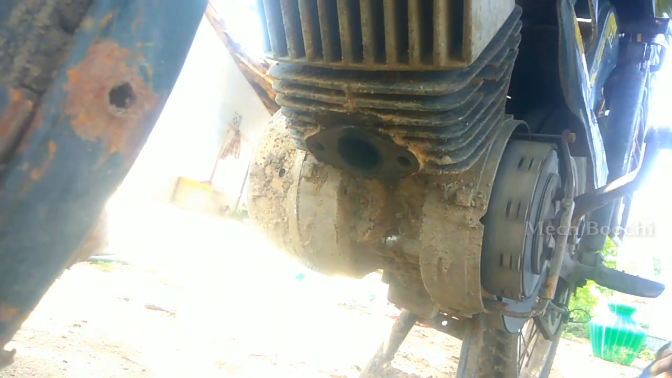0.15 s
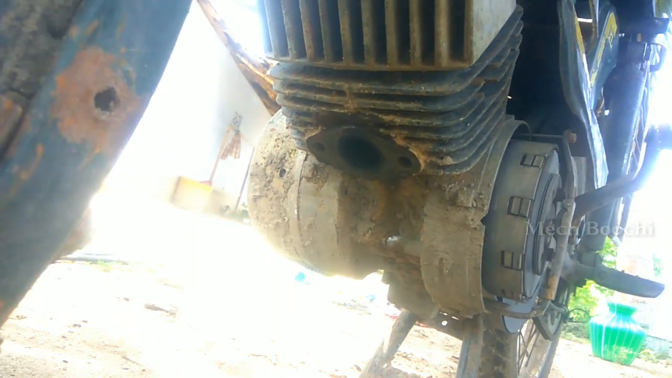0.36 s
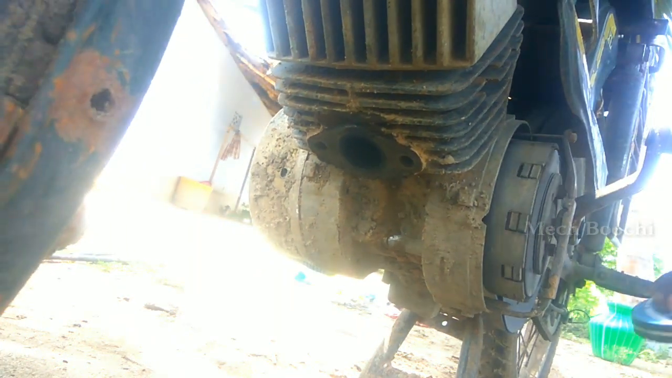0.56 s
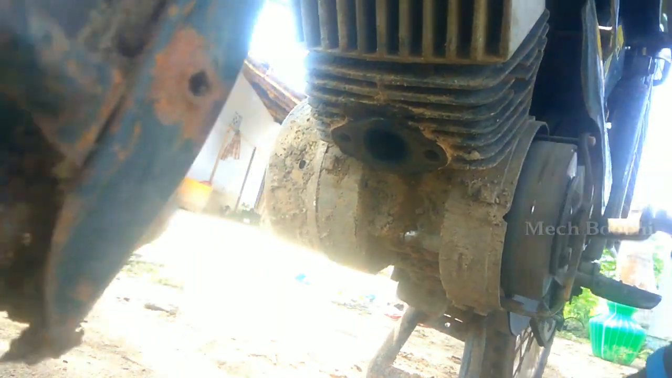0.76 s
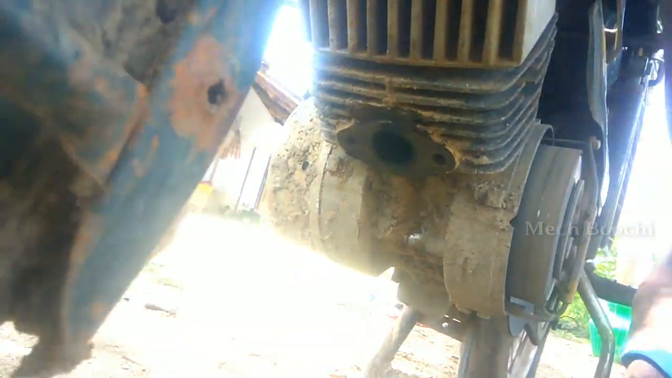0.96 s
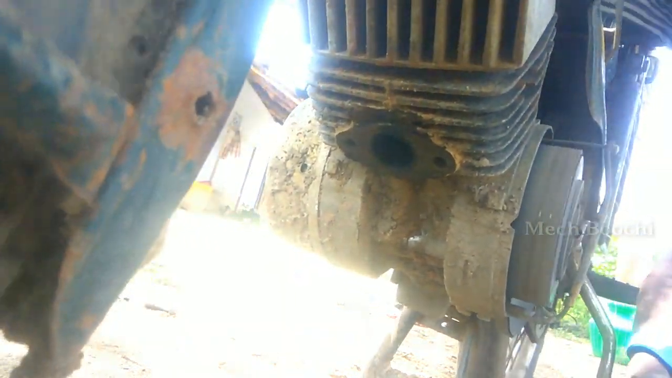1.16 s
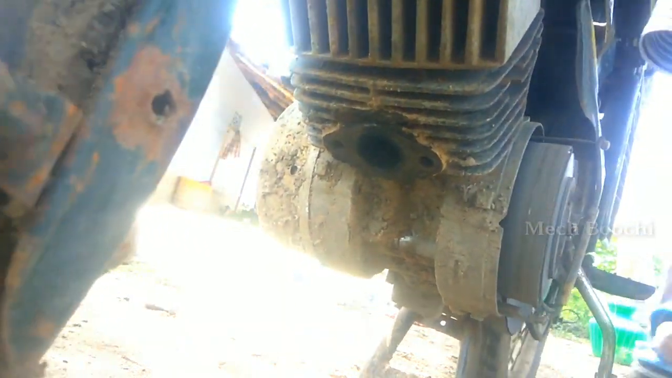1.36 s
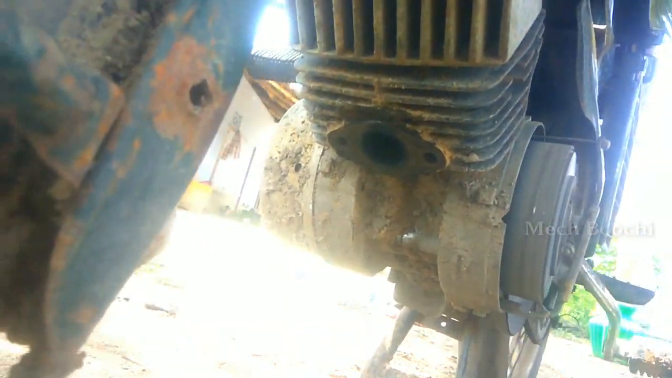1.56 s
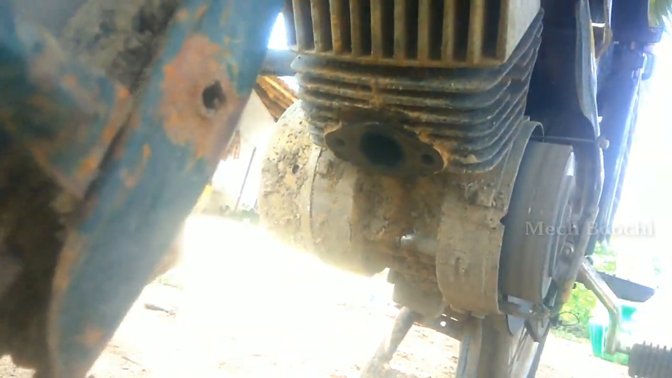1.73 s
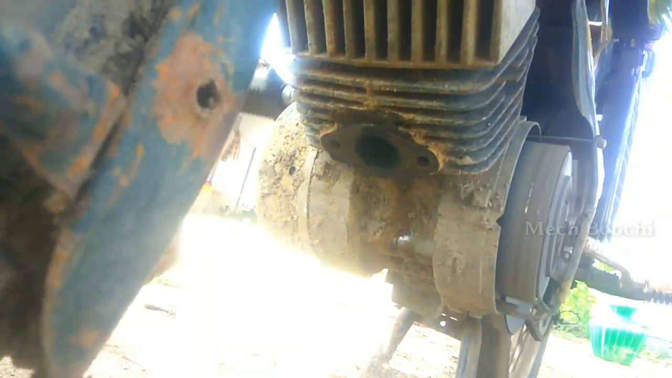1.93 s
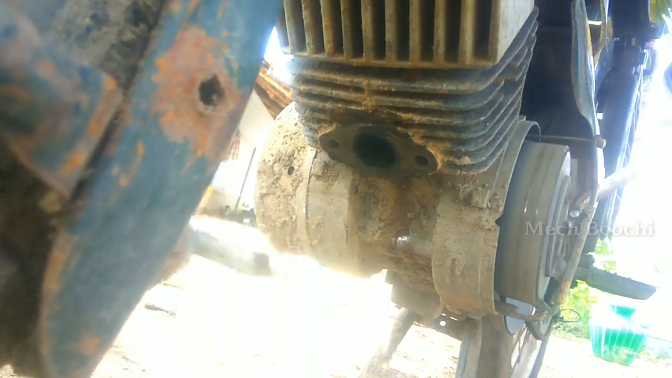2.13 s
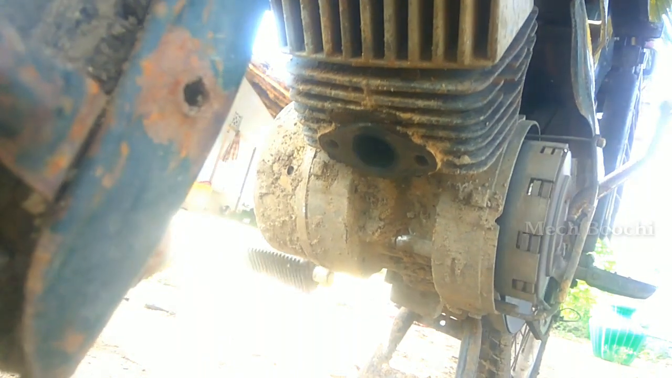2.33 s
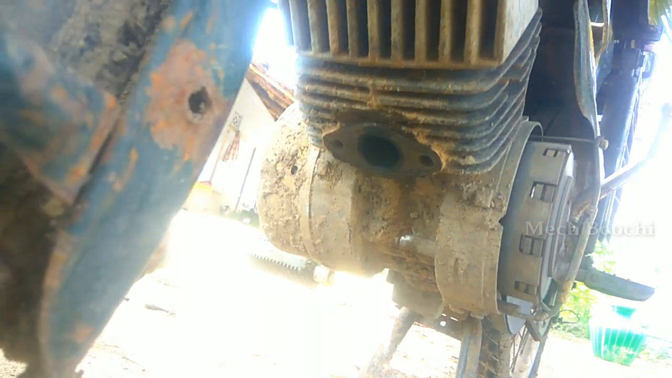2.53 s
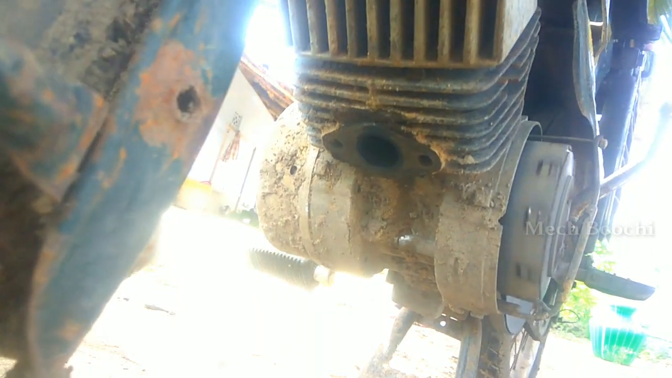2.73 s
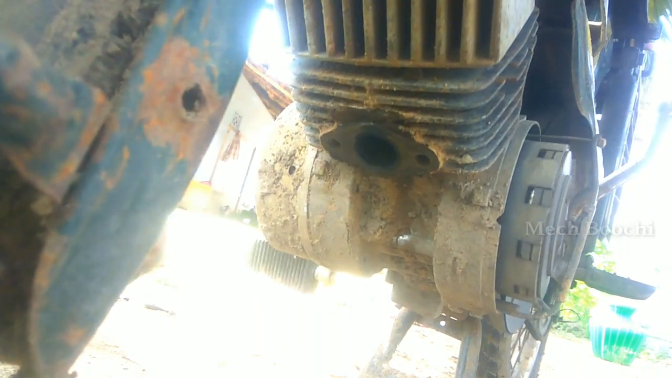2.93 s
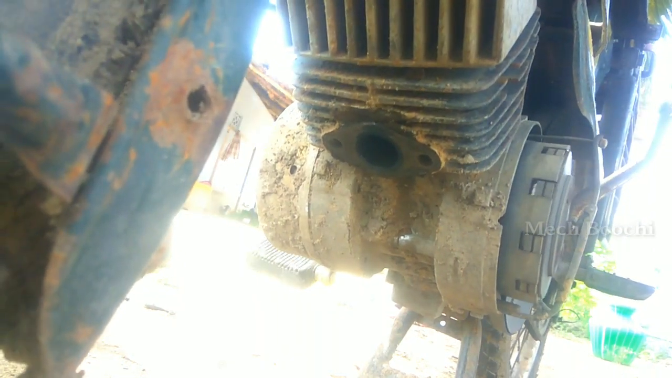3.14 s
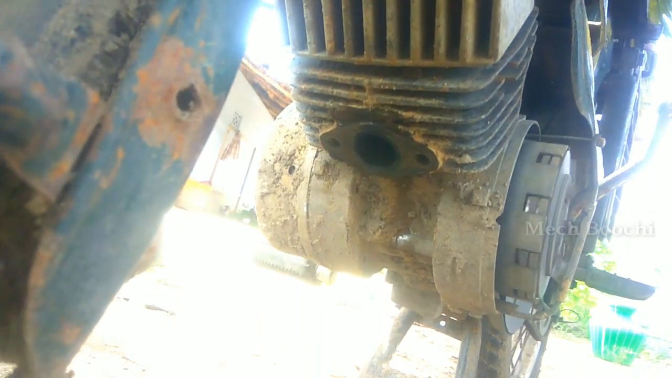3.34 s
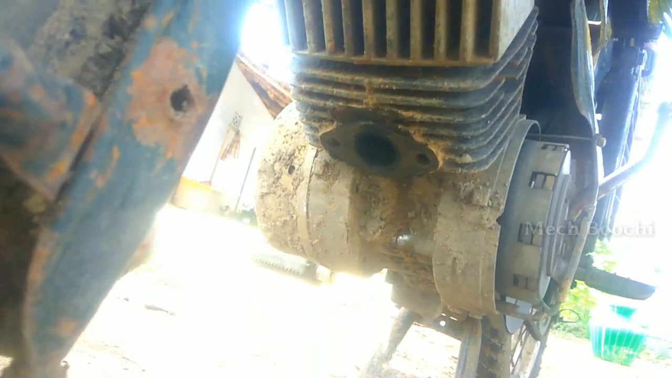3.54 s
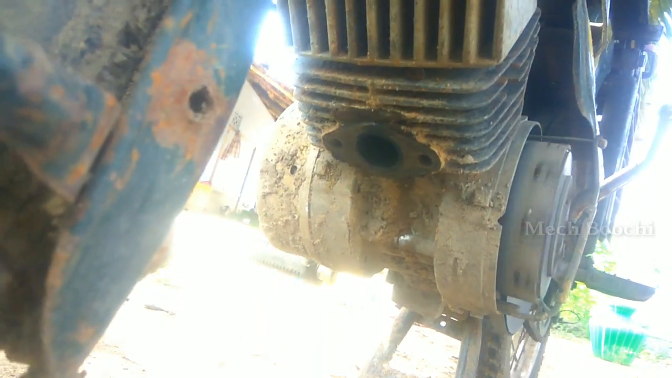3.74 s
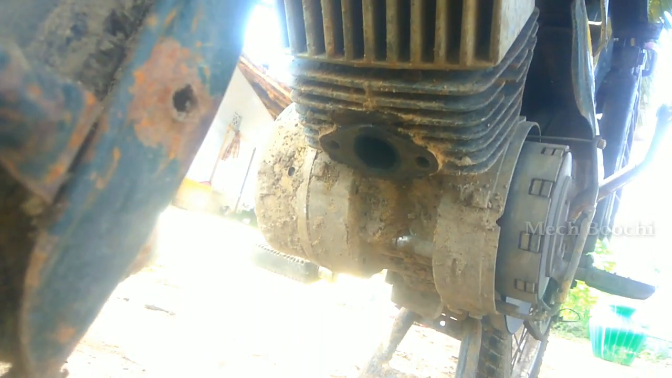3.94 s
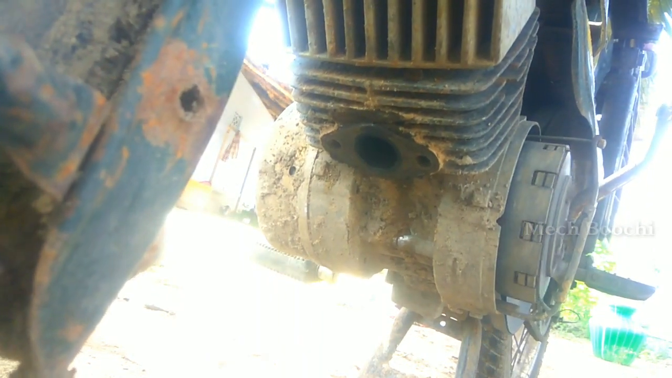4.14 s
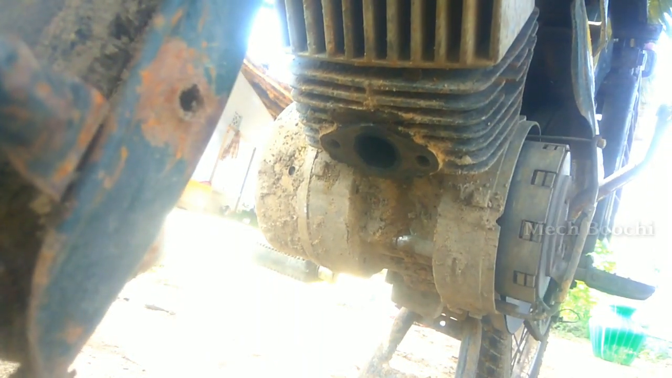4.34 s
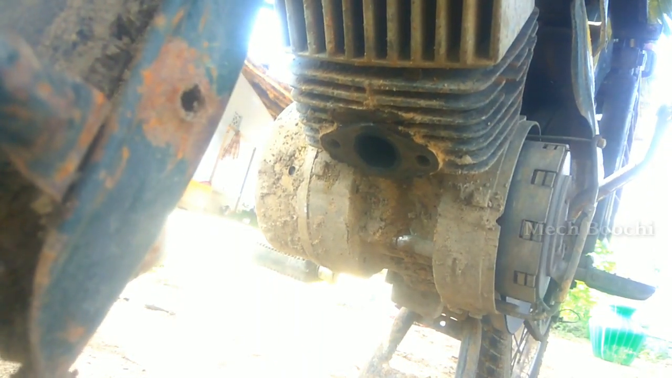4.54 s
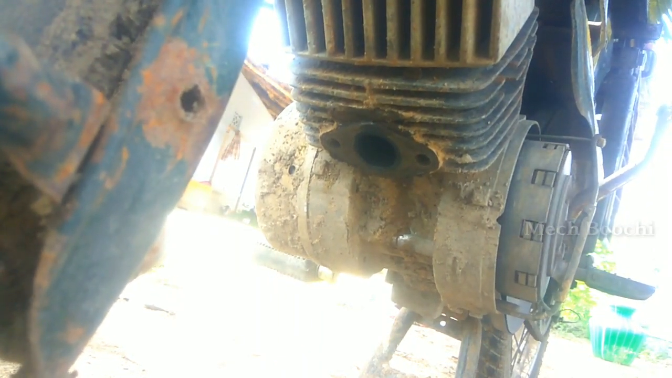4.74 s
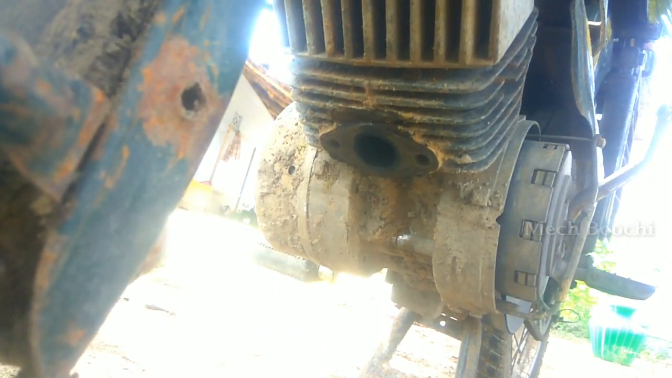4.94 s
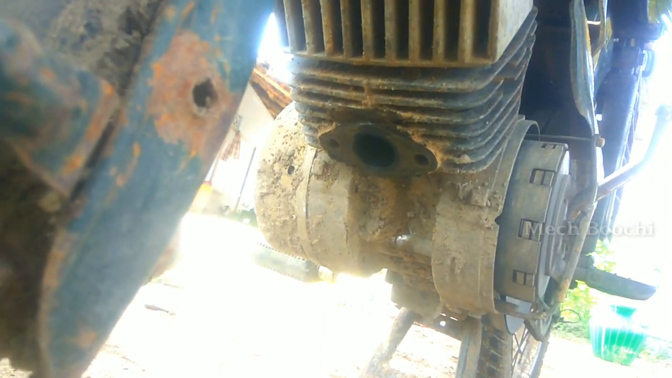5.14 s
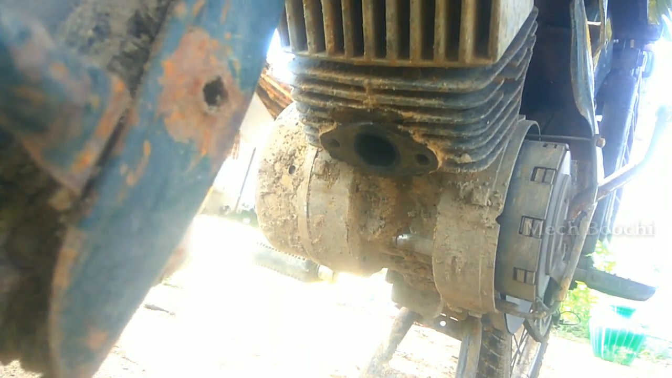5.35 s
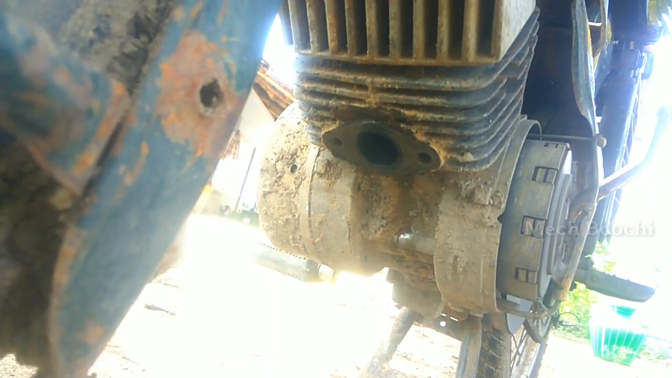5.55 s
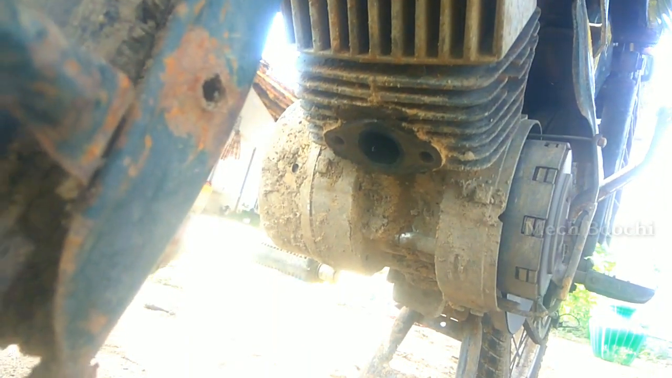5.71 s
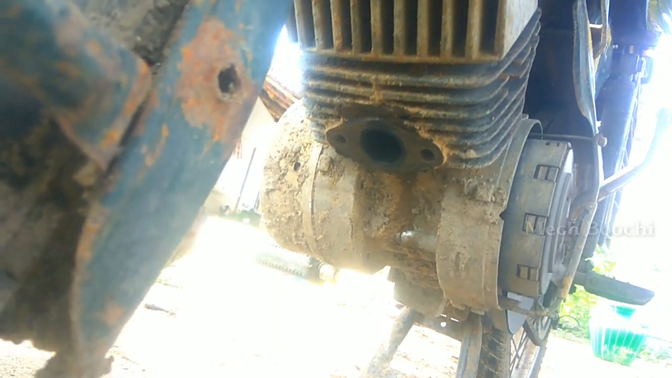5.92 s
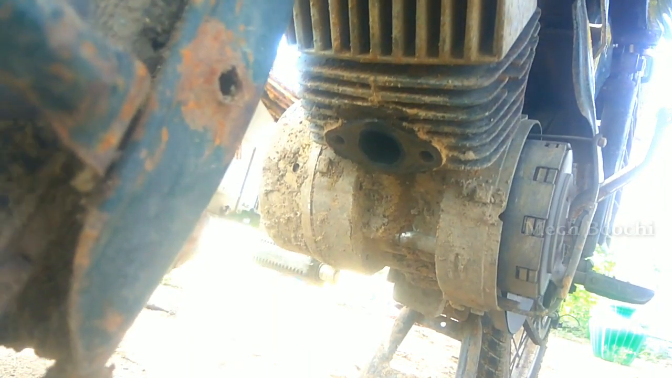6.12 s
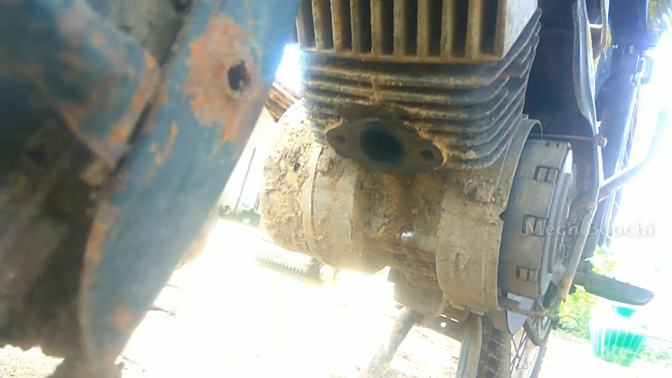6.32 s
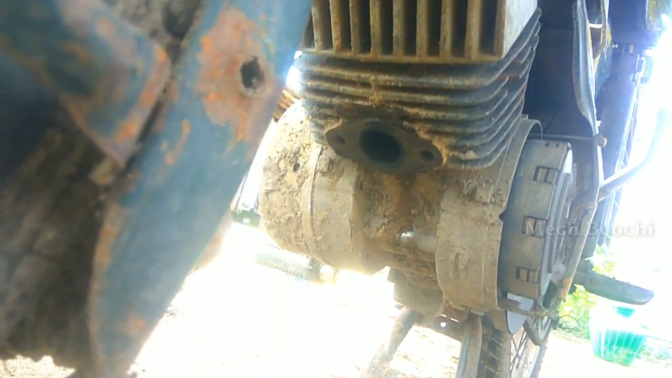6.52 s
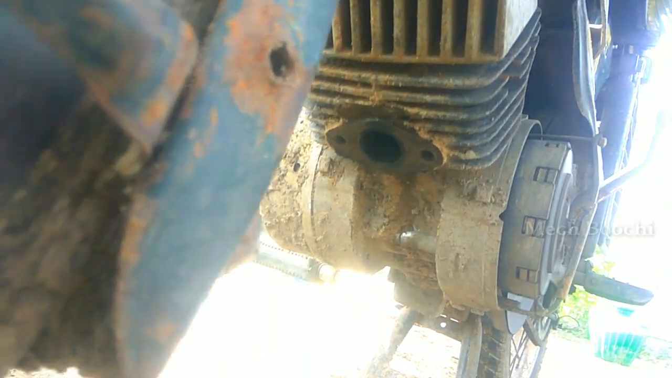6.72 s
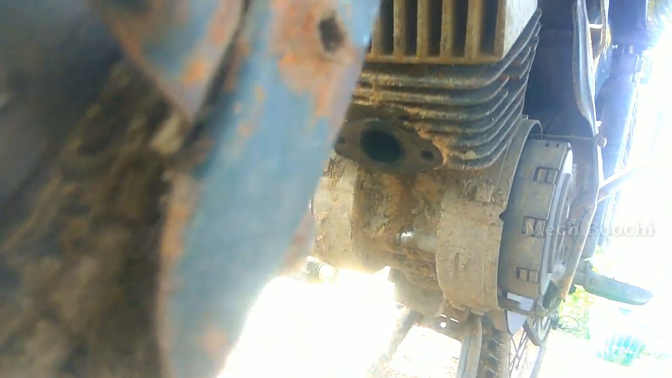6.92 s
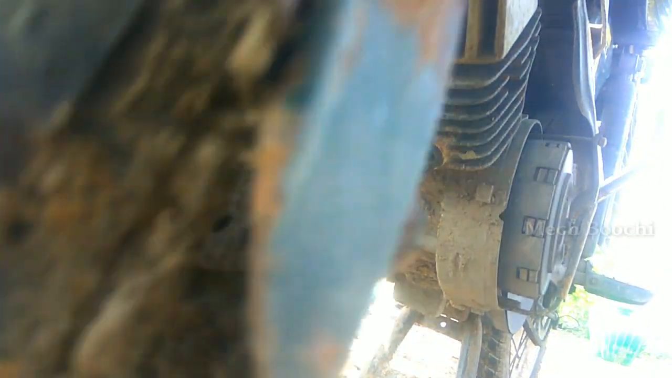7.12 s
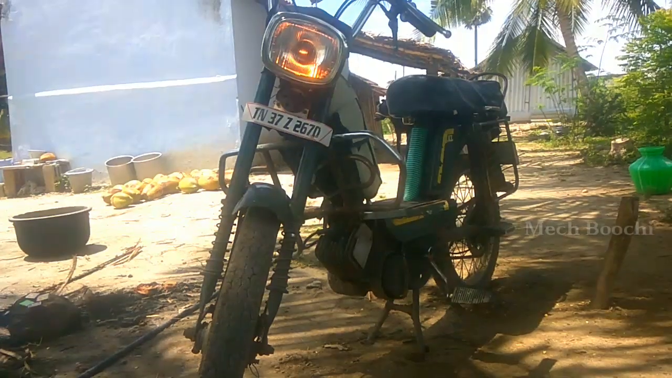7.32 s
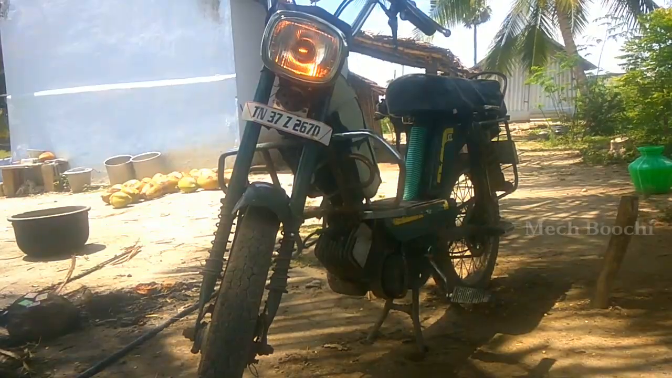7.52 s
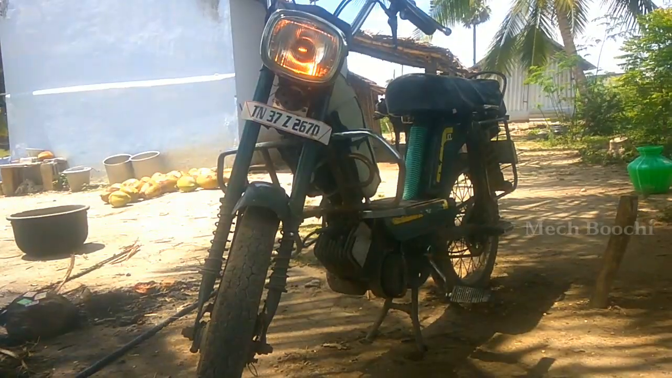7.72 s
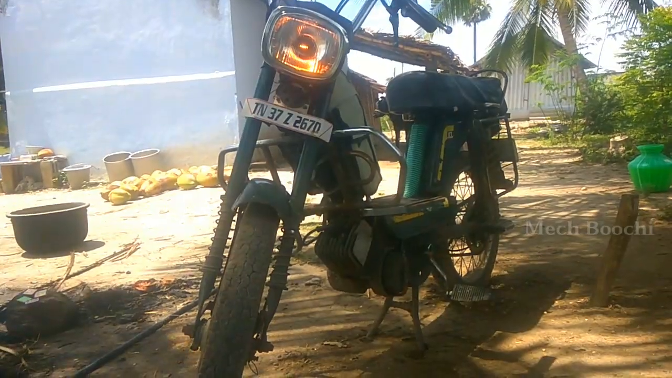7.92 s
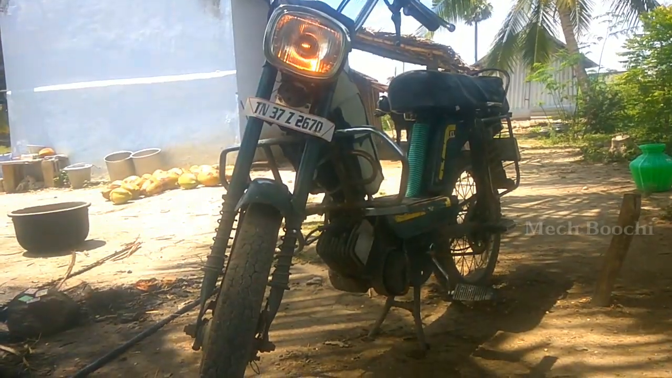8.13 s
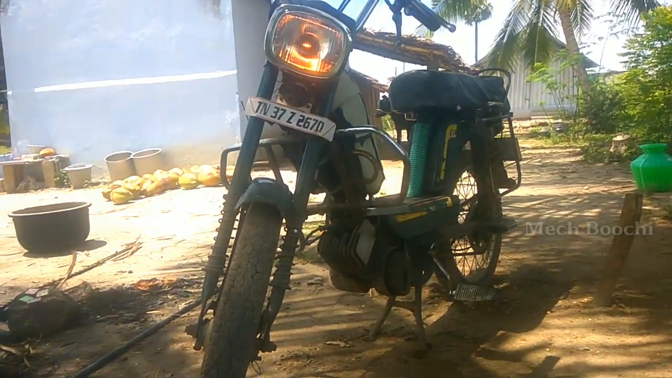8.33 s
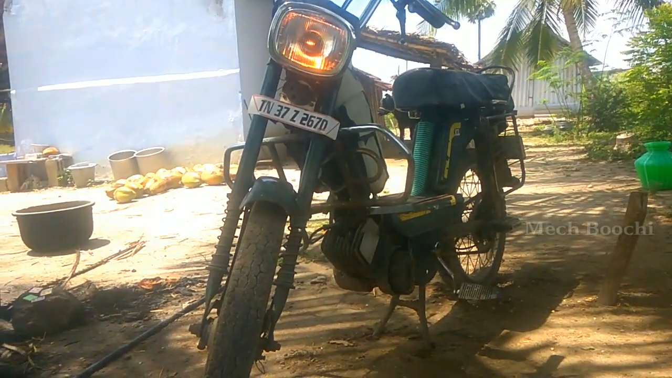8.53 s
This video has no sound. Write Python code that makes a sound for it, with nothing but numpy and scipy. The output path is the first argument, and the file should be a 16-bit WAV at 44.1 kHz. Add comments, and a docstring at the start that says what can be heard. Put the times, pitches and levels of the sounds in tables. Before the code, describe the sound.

Gear whirr, metallic clanks, thin squeals and slow piston chuffs come first, then an unmuffled moped engine bursts into loud, gritty firing. Four throttle blips fuse the bangs into rasping buzzes; between them it coughs unevenly with boomy puffs and metal ticking. The microphone is right beside the port and distorts on peaks. Near the end it fades out, then idling resumes suddenly, thinner and farther away with short yard echoes.

```python
"""A small two-stroke moped without its exhaust is kick-started in a yard, heard close to the open port.
Two kicks whirr, clank and squeal; the engine catches, fires on every turn, and stutters between four throttle blips.
Each firing is a noise jet over a bottle-like boom and a low thump; unfired turns give a hollow puff.
The sound fades out, then the idling engine cuts in from a few steps in front.
Noise, sine sweeps and ringing modes make every layer; table levels are relative, before each layer's mix gain."""
import sys
import numpy as np
from scipy import signal
from scipy.fft import rfft, irfft, next_fast_len
from scipy.io import wavfile
from scipy.ndimage import uniform_filter1d

SR = 44100
rng = np.random.default_rng(int(sys.argv[2]) if len(sys.argv) > 2 else 0)


def to_wav(s):
    """Save 16-bit WAV."""
    ch = np.atleast_2d(s).T  # columns
    pcm = np.round(np.clip(ch, -1, 1) * 32767)  # PCM
    wavfile.write(sys.argv[1], SR, pcm.astype(np.int16))


N = 382347
TIME = np.arange(N) / SR


def from_db(db):
    """Decibels to linear gain."""
    return 10 ** (np.asarray(db) / 20)


def rms_one(x):
    """Scale to an RMS of one."""
    return x / np.sqrt(np.mean(x ** 2) + 1e-20)


def span(length_s):
    """Time axis [s] of a single sound."""
    return np.arange(int(length_s * SR)) / SR


def curve(rows, at, column=1):
    """A control read at the given times."""
    rows = np.array(rows)
    return np.interp(at, rows[:, 0], rows[:, column])


def at_hz(points, hz):
    """A spectral curve read along log frequency."""
    points = np.array(points)
    return np.interp(np.log(hz + 1), np.log(points[:, 0]), points[:, 1])


def add(track, s, sound):
    """Mix a sound in at a time."""
    i = int(np.clip(s * SR, 0, N))
    track[..., i:i + sound.shape[-1]] += sound[..., :N - i]


def delayed(x, count):
    """The same sound a number of samples later."""
    return np.concatenate([np.zeros_like(x[..., :count]), x[..., :N - count]], axis=-1)


def colour(x, points, size=2048):
    """Causal (minimum-phase) filter with the given spectrum; white noise keeps its power."""
    hz = np.arange(size // 2 + 1) * SR / size
    gain = rms_one(from_db(at_hz(points, hz)))
    # folding the cepstrum onto positive time gives minimum phase
    cepstrum = irfft(np.log(gain))[:size // 2]
    cepstrum[1:] *= 2
    impulse = irfft(np.exp(rfft(cepstrum, size)))
    return signal.oaconvolve(x, impulse[None], axes=1)[:, :N]


# stereo image: (frequency [Hz], left-right likeness [0-1])
LIKENESS = [(60, 0.12), (200, 0.98), (350, 0.97), (700, 0.53), (1400, 0.73), (2800, 0.25), (5000, 0.091),
            (12000, 0.23)]


def widen(mid, side):
    """Two channels, most alike in the low hundreds of Hz and looser in the treble."""
    size = next_fast_len(N)
    hz = np.arange(size // 2 + 1) * SR / size
    alike = np.clip(at_hz(LIKENESS, hz), -.99, .99)
    mid = rfft(mid, size) * np.sqrt((1 + alike) / 2)
    side = rfft(side, size) * np.sqrt((1 - alike) / 2)
    return irfft(np.array([mid + side, mid - side]), size)[:, :N]


def noise(points):
    """Stereo noise of a given colour."""
    return colour(widen(*rng.standard_normal((2, N))), points)


def ring(x, modes):
    """Parallel decaying modes of alternating sign; at 0 dB a mode passes the power of white noise."""
    out = 0
    for k, (hz, db, t60) in enumerate(modes):
        radius = from_db(-60 / (t60 * SR))
        angle = 2 * np.pi * hz / SR
        feed = np.sqrt((1 - radius * radius) / 2) * np.array([1, 0, -1])
        feedback = [1, -2 * radius * np.cos(angle), radius * radius]
        out = out + (-1) ** k * from_db(db) * signal.lfilter(feed, feedback, x + 1e-18)
    return out


# kicks on the starter: (start [s], hardest [s], level at start [dB], level at hardest [dB],
# loss afterwards [dB per s])
KICKS = [(0, 0.26, -35.5, -30, 77.5), (0.661, 1.107, -32, -17, 94)]
# each compression brakes the gears: lag behind the stroke, width and depth of the dip
BRAKE_LAG_S, BRAKE_S, BRAKE_DB = 0.024, 0.01, 19


def gear_drive():
    """Each kick swells and runs out; the gears slow briefly at every compression, heard as a level dip."""
    drive = 0
    for start, hardest, start_db, hardest_db, loss_db_per_s in KICKS:
        db = np.interp(TIME, [start, hardest], [start_db, hardest_db])
        db = db - loss_db_per_s * np.maximum(TIME - hardest, 0)
        drive = drive + from_db(db) * (TIME >= start)
    strokes = [row[0] for row in CHUFFS + BANGS if row[0] < CATCH[0]]
    dips = sum(np.exp(-((TIME - s - BRAKE_LAG_S) / BRAKE_S) ** 2) for s in strokes)
    return drive * from_db(-BRAKE_DB * dips)


# clanks of the starter: (time [s], level [dB], decay [s], pitch of the struck part [Hz])
CLANKS = [(0.196, -12.5, 0.0042, 1340), (0.257, -21, 0.012, 766), (0.321, -30, 0.007, 1400),
          (0.425, -27, 0.012, 1350), (0.731, -15, 0.0051, 786)]
# the intake honks as it draws: (time [s], length [s], level [dB])
HONKS = [(0.187, 0.015, -16), (0.953, 0.026, -5), (1.036, 0.034, -4.5)]
# squeals of the starter: (time [s], length [s], from [Hz], to [Hz], level [dB])
SQUEALS = [(0.23, 0.041, 4100, 4280, -18), (0.335, 0.042, 4700, 4130, -20.5),
           (0.657, 0.071, 3820, 4250, -18), (0.768, 0.042, 5650, 6100, -9.5),
           (1.071, 0.033, 4400, 3970, -10)]
# slow chuffs of the piston: (time [s], level [dB], pitch [Hz])
CHUFFS = [(.0, -22, 75.4), (0.132, -26, 109), (0.347, -22.5, 81), (.565, -22, 84)]
# colour of the gear whirr: (frequency [Hz], density [dB per Hz])
WHIRR = [(100, -2.5), (250, -2), (700, -4), (1100, -6.5), (2000, -7.5), (2800, -3), (4100, -0.5),
         (5000, -5), (6000, -5), (7800, -25), (10000, -21), (13000, -76)]
# ringing of the starter gears: (frequency [Hz], level [dB], t60 [s])
GEAR_RING = [(1440, -6, 0.058), (3540, -13.5, 0.13), (4040, -12, 0.082), (5420, -10, 0.12)]
# ringing of the intake: (frequency [Hz], level [dB], t60 [s])
INTAKE_RING = [(620, -2.5, 0.12), (850, -24, 0.0067), (1253, -5, 0.15), (1960, 8, 0.013), (1904, 6, 0.044),
               (2530, -5, 0.033), (3000, -10, .02), (3810, -3.5, 0.044)]
STARTER_TOP_HZ = 8000


def starter():
    """Rubbing gears whirr and ring, struck parts clank, sliding tones squeal, the piston chuffs, the intake honks."""
    t = span(.2)
    knocks, draw, tones, chuffs = np.zeros((4, N))
    for s, db, decay, hz in CLANKS:
        fall = np.exp(-t / decay)
        add(tones, s, from_db(db - 2.5) * np.sin(2 * np.pi * hz * t) * fall)
        add(knocks, s, from_db(db) * (1 - np.exp(-t / 0.00067)) * fall)
    for s, length, db in HONKS:
        add(draw, s, from_db(db) * np.sin(np.pi * np.minimum(t / length, 1)) ** 2)
    for s, length, from_hz, to_hz, db in SQUEALS:
        u = np.minimum(t / length, 1)
        wobble = rms_one(uniform_filter1d(rng.standard_normal(len(t)), size=16))
        hz = (from_hz + (to_hz - from_hz) * u) * (1 + 0.04 * wobble)
        add(tones, s, from_db(db) * np.sin(np.pi * u) * np.sin(2 * np.pi * np.cumsum(hz) / SR))
    for s, db, hz in CHUFFS:
        swell = np.sin(np.pi * np.minimum(t / 0.033, 1))
        add(chuffs, s, from_db(db - 4) * np.sin(2 * np.pi * hz * t) * swell)
    # uneven tooth contacts
    unevenness = rms_one(uniform_filter1d(rng.standard_normal(N), size=150))
    teeth = rms_one(from_db(2 * unevenness))
    friction = widen(*rng.standard_normal((2, N)))
    rub = (gear_drive() * teeth + .5 * knocks) * friction
    gears = from_db(1.0) * colour(rub, WHIRR) + from_db(-7.5) * ring(rub, GEAR_RING)
    honks = from_db(-9.5) * ring((draw + 1.17 * knocks) * friction[:, ::-1], INTAKE_RING)
    lowpass = signal.butter(6, min(STARTER_TOP_HZ, .45 * SR), fs=SR, output="sos")
    return signal.sosfilt(lowpass, gears + honks + tones + chuffs)


# crank speed with the throttle shut: (time [s], speed [turns per s])
IDLE_SPEED = [(0.97, 10), (1.08, 21), (1.23, 23.2), (1.35, 36.5), (1.5, 37), (1.58, 41), (1.9, 41.5),
              (2.1, 43.3), (3.35, 44.4), (4.18, 39.4), (4.85, 39.2), (6.3, 45), (7.3, 45), (7.8, 43),
              (8.67, 42)]
# throttle blips, in which every turn fires: (opens [s], shuts [s])
BLIPS = [(1.381, 1.732), (2.7063, 2.8668), (3.2314, 3.3244), (3.67, 3.8174)]
# a blip adds speed, which runs out again once the throttle shuts
BLIP_TURNS_PER_S, SPIN_UP_S, RUN_DOWN_S = 17, .043, .141


def crank(s):
    """Turns per second: idle speed plus what each blip adds."""
    speed = curve(IDLE_SPEED, s)
    for opens, shuts in BLIPS:
        spin_up = 1 - np.exp(-np.clip(s - opens, 0, shuts - opens) / SPIN_UP_S)
        run_down = np.exp(-(np.maximum(s - shuts, 0) / RUN_DOWN_S) ** 2)
        speed = speed + BLIP_TURNS_PER_S * spin_up * run_down
    return speed


# the engine catches and fires on every turn: (from [s], to [s])
CATCH = (1.0846, 1.381)


def port_openings():
    """One time for each turn of the crank; the catch, bangs and blip edges fall on whole turns."""
    marks = np.unique([*CATCH, *np.ravel(BLIPS), *[row[0] for row in BANGS]])
    angle = np.cumsum(crank(TIME)) / SR
    at_marks = np.interp(marks, TIME, angle)
    whole = np.append(0, np.cumsum(np.round(np.diff(at_marks))))
    angle = angle + np.interp(TIME, marks, whole - at_marks)
    return np.interp(np.arange(int(angle[-1]) + 1), angle, TIME)


# bangs that stand out by force or by falling out of step:
# (time [s], blast level [dB], cylinder boom level [dB])
BANGS = [(0.916, -14.5, -1), (1.025, -25.5, -0.5), (1.9303, -10, -29), (2.0657, -9.5, -9.5),
         (2.1542, -7, -14), (2.362, -8.5, -1), (2.5226, -8, -46), (2.6623, -8, -13), (2.9738, -10.5, -15),
         (3.119, -6.5, -12.5), (3.5761, -11, -10), (3.991, -10, -25), (4.16, -9, -19), (4.2636, -7.5, -13),
         (4.388, -7, -17), (4.5146, -7, -20), (4.6903, -16, 3), (4.744, -6.5, -2), (4.8722, -9, -15),
         (4.976, -8, -18), (5.0754, -6, -30), (5.3225, -9.5, -23), (5.4187, -10.5, -12), (5.513, -8.5, -24),
         (5.605, -7.5, -19.5), (5.7662, -7.5, -25), (5.8825, -10, -16), (6.202, -16.5, -14.5),
         (6.2496, -12.5, -3), (6.2984, -8, -20), (6.856, -7, -36), (6.9424, -9, -26), (7.099, -9, -46),
         (7.2505, -9, -38), (7.8143, -12, -0.5), (7.859, -10.5, 4), (7.93, -9, -4), (8.0003, -12, -10),
         (8.023, -14.5, -26), (8.1423, -10.5, -1), (8.3773, -11, 4.5), (8.6175, -9, -35)]
# strength of the ordinary firings: (time [s], blast level [dB], cylinder boom level [dB])
BURN = [(1.1, -11.5, -2), (2.4, -10.5, -24), (4.5, -11.5, -16), (5.5, -10.5, -17), (6.5, -10, -27.5),
        (7.2, -11.5, -38), (7.8, -12, 0)]
# turns needed to flush the cylinder at idle, and turns from a blip's end to its last cough
FLUSH_TURNS, COUGH_TURNS = 3, 2
OPEN_BLAST_DB, OPEN_BOOM_DB = 0, -0.5   # change with the throttle open
HALF_BLAST_DB, HALF_BOOM_DB = -5.5, 7   # change when the charge only half burns
BURN_SPREAD_DB = 1.0   # random blast spread from firing to firing


def ignition():
    """Sort the turns into firings (time [s], blast [dB], boom [dB]) and unfired turns (time [s]).
    At idle the charge lights only once flushed; a half burn leaves fuel for a hard bang two turns later."""
    times = port_openings()

    def turn(s):
        return int(np.argmin(np.abs(times - s)))

    bangs = {turn(row[0]): row[1:] for row in BANGS}
    catching = set(range(turn(CATCH[0]), turn(CATCH[1])))
    throttled = {k for opens, shuts in BLIPS for k in range(turn(opens), turn(shuts) + 1)}
    coughs = {turn(shuts) + COUGH_TURNS for opens, shuts in BLIPS}
    certain = set(bangs) | catching | throttled | coughs
    firings, unfired, last = [], [], 0
    for k, (s, chance) in enumerate(zip(times, rng.standard_normal(len(times)))):
        # an idle firing also keeps clear of certain ones one or three turns ahead
        flushed = k - last >= FLUSH_TURNS and not {k + 1, k + FLUSH_TURNS} & certain
        if k not in certain and not flushed:
            unfired.append(s)
            continue
        blast_db = curve(BURN, s) + BURN_SPREAD_DB * chance
        boom_db = curve(BURN, s, column=2)
        if k in bangs:
            blast_db, boom_db = bangs[k]
        elif k in throttled:
            blast_db, boom_db = blast_db + OPEN_BLAST_DB, boom_db + OPEN_BOOM_DB
        elif k + 2 in bangs:
            blast_db, boom_db = blast_db + HALF_BLAST_DB, boom_db + HALF_BOOM_DB
        firings.append((s, blast_db, boom_db))
        last = k
    return firings, unfired


# the unfired turns: (time [s], puff level [dB], piston slap level [dB])
COASTING = [(1.4, -3.5, -12), (2.5, -3, -8), (3.6, -6, -15), (4.5, -4.5, -13), (5.4, -6, -13.5),
            (7.2, -6.5, -12.5), (7.8, -15, -14), (8.67, -13.5, -20)]
PUFF_LOSS_DB = 0.22   # for each turn per s above 44
PUFF_SPREAD_DB = 0.74   # random boom spread from puff to puff


def puff_db(s):
    """An unfired turn puffs less when the crank spins fast."""
    return curve(COASTING, s) - PUFF_LOSS_DB * max(crank(s) - 44, 0)


def port_phase(s, open_s, speed_power):
    """Time after the port opens, and the same as a share of its opening, which is shorter at speed."""
    t = span(.06)
    return t, t / (open_s * (40 / max(crank(s), 18)) ** speed_power)


# colour of the gas that trails each blast: (frequency [Hz], density [dB per Hz])
TRAIL = [(150, -11.5), (700, 10), (2000, -7.5), (4000, -7.5), (6500, -5.5), (8000, -13), (15000, -13.5)]


def blowdown(firings, unfired, rise=0.25, fall=0.036, close=3.67, tail_db=-15, tail_s=0.0057,
             repeat=0.25, puff_hiss_db=-18, crack_db=-6, crack_hz=1080, crack_s=0.0018):
    """Burnt gas cracks the port open, then tears through until it shuts; part of the jet repeats each firing."""
    jet, trail, cracks = np.zeros((2, N)), np.zeros(N), np.zeros(N)
    same = rng.standard_normal((2, SR))
    for s, db, _ in firings:
        t, u = port_phase(s, open_s=0.0082, speed_power=0.05)
        speed = max(crank(s) / 40, 1)
        share = np.clip(repeat * speed ** 2, 0, 1)   # firings grow more alike at speed
        flow = (1 - np.exp(-(u / rise) ** 2)) * np.exp(-fall * (u - .5)) / (1 + u ** close)
        fresh = rng.standard_normal((2, len(t)))
        tearing = np.sqrt(1 - share) * fresh + np.sqrt(share) * same[:, :len(t)]
        add(jet, s - .0005, from_db(db) * flow * tearing)
        add(trail, s, from_db(db + tail_db) * (1 - np.exp(-u)) * np.exp(-t / tail_s))
        # the crack is higher at speed and drops in pitch as the slit widens
        hz = crack_hz * speed ** .9 * (1 + .3 * np.exp(-t / .001))
        hz = hz * (1 + .012 * rng.standard_normal())
        pulse = t / crack_s * np.exp(1 - t / crack_s)
        crack = np.sin(2 * np.pi * np.cumsum(hz) / SR) * pulse
        add(cracks, s, from_db(db + crack_db) * speed ** 2.7 * crack)
    for s in unfired:
        t, u = port_phase(s, open_s=0.0015, speed_power=0.33)
        add(trail, s, from_db(puff_db(s) + puff_hiss_db) * u * np.exp(1 - u))
    return widen(*jet) + trail * noise(TRAIL), cracks


def boom(s, open_s=0.01056, low_hz=190, start_hz=300, end_hz=300, damping=1.0, overtone_db=-15):
    """The cylinder rings like a bottle: its note falls as the piston drops and rises as the port shuts."""
    _, u = port_phase(s, open_s, speed_power=0.56)
    along = np.minimum(u, 1) / 0.59 - 1
    hz = low_hz + np.where(along < 0, start_hz, end_hz) * along ** 2
    hz = hz * (max(crank(s), 30) / 40) ** 0.7   # higher at speed
    phase = 2 * np.pi * np.cumsum(hz) / SR * (1 + .02 * rng.standard_normal())
    swell = np.abs(np.sin(np.pi * np.minimum(u, 1))) ** 0.39 * np.exp(-damping * (u - .5))
    return -1.6 * swell * (np.sin(phase) + from_db(overtone_db) * np.sin(2 * phase))


THUMP_FOLLOWS = 0.24   # dB per dB of a firing's cylinder boom


def cylinder(firings, unfired, thump_db=-4.0, thump_growth=2.2, thump_hz=78, thump_s=0.0049,
             lead_s=0.00022, gust_db=-21, gust_s=0.0079):
    """Every turn booms; a firing also leaves a deep swing of suction and rebound, and a gust of gas."""
    booms, thumps, gusts = np.zeros((3, N))
    for s in unfired:
        db = puff_db(s) + PUFF_SPREAD_DB * rng.standard_normal()
        add(booms, s - lead_s, from_db(db) * boom(s))
    for s, blast_db, boom_db in firings:
        add(booms, s - lead_s, from_db(boom_db - 5.5) * boom(s))
        t = span(.06)
        speed = max(crank(s) / 40, 1)
        spread = np.clip(rng.standard_normal(), -2, 2)
        hz = thump_hz * speed ** 1.17 * np.exp(0.22 / speed ** 4 * spread)   # steadier at speed
        swing = np.sin(2 * np.pi * hz * t) * (t / thump_s) ** 2 * np.exp(2 - 2 * t / thump_s)
        swing_db = thump_db + blast_db + THUMP_FOLLOWS * boom_db
        add(thumps, s, from_db(swing_db) * speed ** thump_growth * swing)
        gust = t / gust_s * np.exp(1 - t / gust_s)
        add(gusts, s, from_db(gust_db + blast_db + 13.5) / speed ** 2 * gust)
    low_rumble = [(28, -27.0), (55, -6), (100, -2.0), (200, -10.5), (1000, -80.5)]   # (Hz, dB)
    buffet = colour(rng.standard_normal((2, N)), low_rumble, size=8192)
    return booms, thumps + gusts * (buffet + 0.35 * buffet[::-1])


# ringing of the cylinder barrel under the piston: (frequency [Hz], level [dB], t60 [s])
BARREL_RING = [(654, -1, 0.047), (1180, -1.5, 0.01), (1363, 5, 0.018), (1877, 0.5, 0.018), (2064, 2, 0.027),
               (5100, -26.5, 0.023)]
SLAP_FOLLOWS = 0.33   # dB per dB of a firing's cylinder boom


def piston_slap(firings, unfired, fired_db=13, second_db=-3, second_turn=0.37, slap_s=0.00032):
    """Twice a turn the piston knocks the barrel, hardest when the charge booms inside the cylinder."""
    knocks = np.zeros(N)
    t = span(.02)
    pushes = [(s, 0) for s in unfired]
    pushes += [(s, max(fired_db + SLAP_FOLLOWS * boom_db, 0)) for s, _, boom_db in firings]
    for s, push_db in pushes:
        db = curve(COASTING, s, column=2) + 2 * rng.standard_normal()
        knock = from_db(db) * np.exp(-t / slap_s)
        add(knocks, s, from_db(push_db) * knock)
        add(knocks, s + second_turn / crank(s), from_db(second_db) * knock)
    return ring(knocks * widen(*rng.standard_normal((2, N))), BARREL_RING)


# hollow metallic knocks as the idle slows: (time [s], level [dB])
KNOCKS = [(4.109, -14), (4.338, -7), (4.464, -9), (4.639, -12), (4.693, -7.5), (4.819, -14)]
# ringing of the knocked metal: (frequency [Hz], level [dB], t60 [s])
KNOCK_RING = [(620, -11.5, 0.023), (1780, 0.5, .012), (2070, 1, 0.028), (3100, -13.5, 0.013),
              (4300, -14.5, .012)]
KNOCK_S = 0.0036   # decay of the contact noise


def knocking(apart=.5):
    """A short rattle of contact sets the metal ringing, a little differently at each ear."""
    t = span(.1)
    out = np.zeros((2, N))
    for s, db in KNOCKS:
        mid, side = rng.standard_normal((2, len(t))) * np.exp(-t / KNOCK_S)
        contact = np.array([mid + apart * side, mid - apart * side])
        add(out, s, from_db(db + 4) * ring(contact, KNOCK_RING))
    return out


def yard(x, first_s, t60):
    """Scattered echoes from walls and trees, different at each ear: decaying noise as a reverb."""
    t = span(.4)
    echoes = rng.standard_normal((2, len(t))) * (t > first_s) * from_db(-60 * t / t60)
    echoes = echoes / np.sqrt(np.sum(echoes ** 2) / 2)
    return signal.oaconvolve(x, echoes, axes=1)[:, :N]


# colour of the jet close up: (frequency [Hz], density [dB per Hz])
BLAST_NEAR = [(150, -12.5), (400, 0.5), (650, -5.5), (880, -4), (1100, -4.5), (1600, -10.5), (2400, -3),
              (4000, -3.5), (6500, -7.5), (7800, -20.5), (11000, -22), (15500, -35.5)]
# ringing of fins and crankcase: (frequency [Hz], level [dB], t60 [s])
FIN_RING = [(1015, -6.5, 0.025), (2114, -3, 0.04), (2537, -14, 0.044), (3040, -25, 0.09), (3706, -20, 0.05),
            (6600, -14.5, 0.066)]
# reflections from ground and frame: (delay [s], level [dB])
NEARBY = [(.0034, -20), (.0071, -34), (0.0118, -18)]
# what a reflection keeps: (frequency [Hz], level [dB])
DULLED = [(100, -1), (6500, 3), (8500, 2.5), (15000, -26)]
# gas hiss that lasts through the whole turn: (time [s], level [dB])
HISS = [(1.0, -54), (1.45, -21.5), (2.44, -29.5), (2.89, -26.5), (5.0, -36.5), (7.2, -26)]
# colour of the steady hiss and clatter: (frequency [Hz], density [dB per Hz])
CLATTER = [(40, -6.5), (90, 0), (250, 14), (600, 4), (1100, 3), (2000, -0.5), (3000, -2.5), (6500, -11),
           (7800, -40), (15000, -66)]


def beside_port(jet, cracks, booms, thumps, slap):
    """Close up: jet, ringing fins, steady hiss and clatter, and quick, duller reflections."""
    blast = from_db(6) * colour(jet, BLAST_NEAR) + from_db(-1.5) * ring(jet, FIN_RING) + cracks
    direct = blast + from_db(-2.0) * booms + thumps + slap
    reflected = sum(from_db(db) * delayed(blast, count=int(s * SR)) for s, db in NEARBY)
    scattered = from_db(-14.5) * yard(direct, first_s=0.0091, t60=0.14)
    echoes = from_db(-4.0) * colour(reflected + scattered, DULLED)
    clatter = from_db(curve(HISS, TIME) + 6.0) * noise(CLATTER) * (TIME > 1)
    return direct + echoes + clatter


# colour of the jet from in front: (frequency [Hz], density [dB per Hz])
BLAST_FRONT = [(150, 1.5), (500, 4.5), (850, -20.5), (1250, -4.5), (1700, -7), (2600, 2), (4000, -5),
               (6400, -9), (7800, -28.5), (11000, -36), (15500, -44)]
# colour of the wall's answer: (frequency [Hz], density [dB per Hz])
ECHO_FRONT = [(100, -32), (400, -20), (1200, -19), (2400, 11.5), (5500, 13), (7000, 12), (8000, 20),
              (15000, -44)]


def in_front(jet, cracks, booms, thumps, slap):
    """From a few steps away the frame rings along and the house wall answers each bang."""
    blast = from_db(10.5) * colour(jet, BLAST_FRONT) + from_db(3.5) * cracks
    frame_modes = [(552, 8.5, 0.035), (2570, 3, 0.05), (2050, 5.0, 0.018), (3340, -2, 0.09)]   # (Hz, dB, s)
    frame = from_db(-11.0) * ring(jet, frame_modes)
    body = from_db(-4.5) * booms + from_db(-21) * thumps + from_db(-4.5) * slap
    direct = blast + frame + body
    echoes = from_db(-17.0) * yard(colour(direct, ECHO_FRONT), first_s=0.024, t60=0.18)
    return direct + echoes + from_db(-27.5) * noise(CLATTER)


FADE_FROM_S, FADE_TO_S, FADE_POWER = 7.228, 7.41, 1.33


def scene():
    """The kick-start and the run heard close up fade out; the idle cuts in from the front."""
    turns = ignition()
    sources = (*blowdown(*turns), *cylinder(*turns), piston_slap(*turns) + knocking())
    fade_out = np.interp(TIME, [FADE_FROM_S, FADE_TO_S], [1, 0]) ** FADE_POWER
    cut_in = np.interp(TIME, [7.78, 7.79], [0, 1])
    air = from_db(-50) * noise(CLATTER)
    close_up = beside_port(*sources) + starter() + air
    return close_up * fade_out + in_front(*sources) * cut_in


CUTOFF_HZ = 15700


def record(dry, top=1.0, hardness=2.13):
    """Close up, the right side hears the engine slightly earlier; peaks overload and the top is cut."""
    left = np.where(TIME < 7.6, delayed(dry[0], count=2), dry[0])
    late = np.array([left, dry[1]])
    loud = late / (1 + np.abs(late / top) ** hardness) ** (1 / hardness)
    lowpass = signal.cheby2(14, 60, CUTOFF_HZ + 700, fs=SR, output="sos")   # stopband starts 700 Hz higher
    return signal.sosfilt(lowpass, loud)


dry = scene()
out = record(dry)
to_wav(out)
```